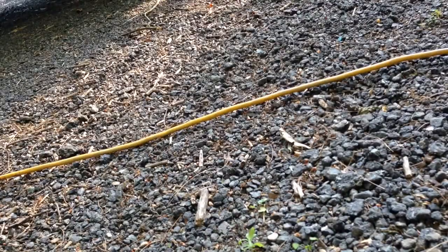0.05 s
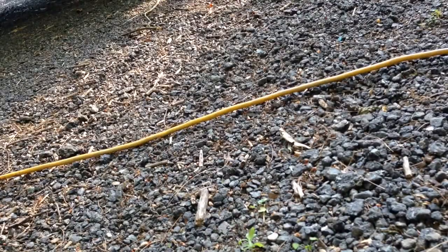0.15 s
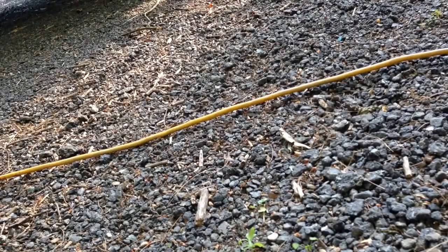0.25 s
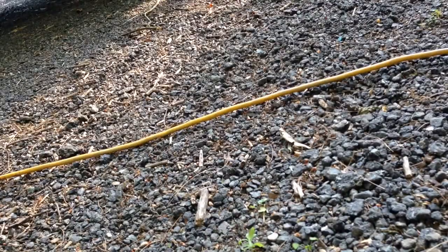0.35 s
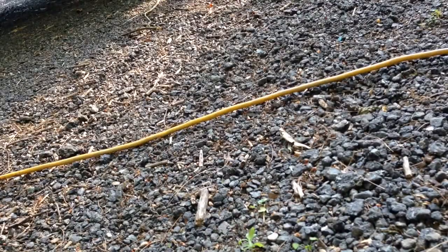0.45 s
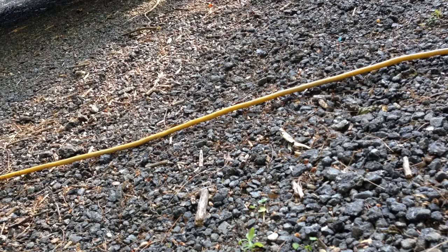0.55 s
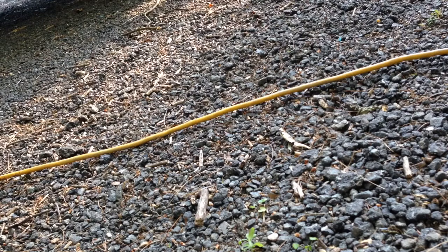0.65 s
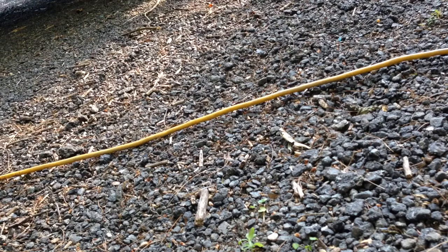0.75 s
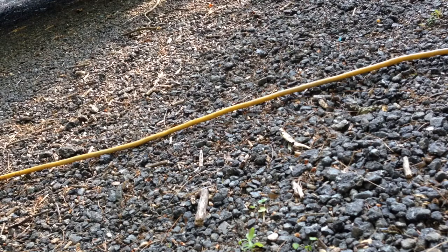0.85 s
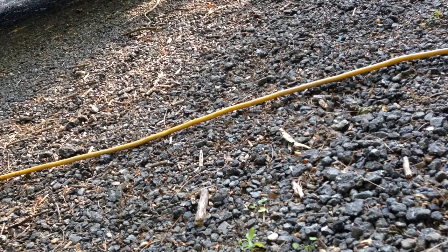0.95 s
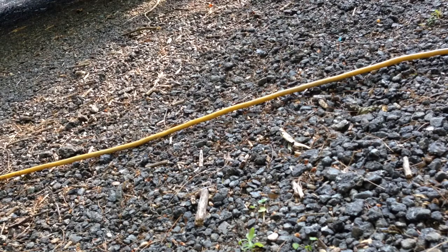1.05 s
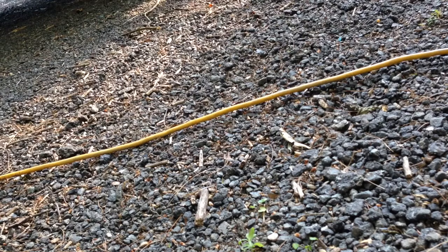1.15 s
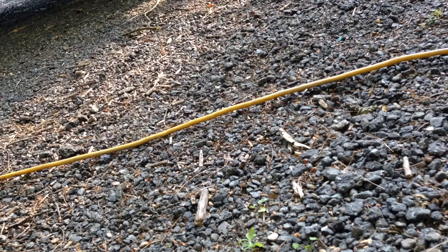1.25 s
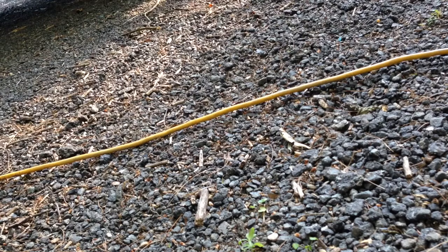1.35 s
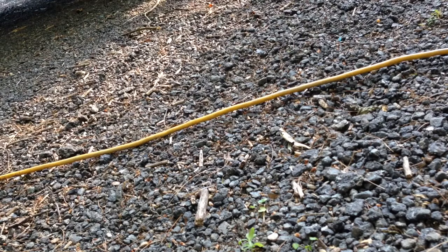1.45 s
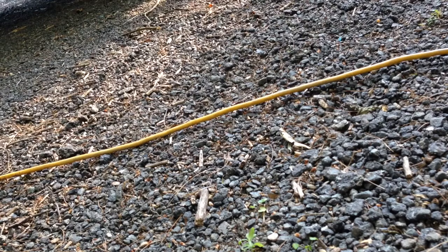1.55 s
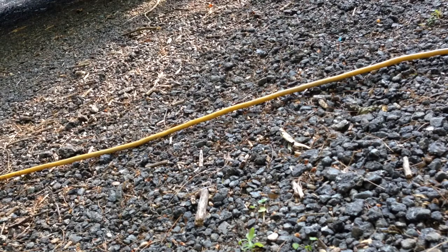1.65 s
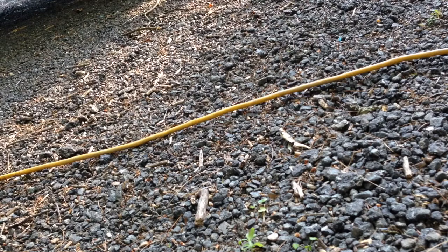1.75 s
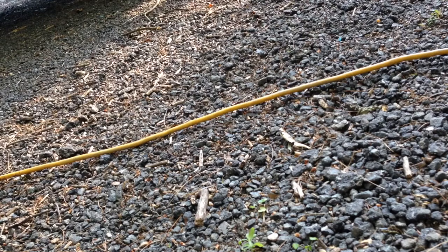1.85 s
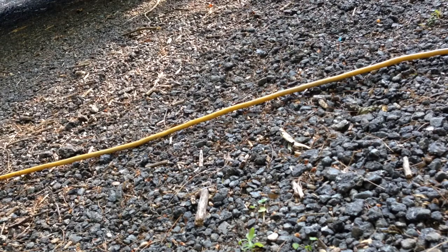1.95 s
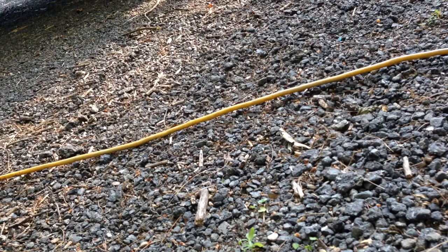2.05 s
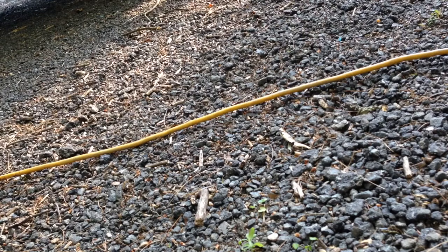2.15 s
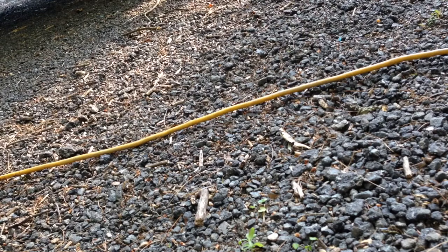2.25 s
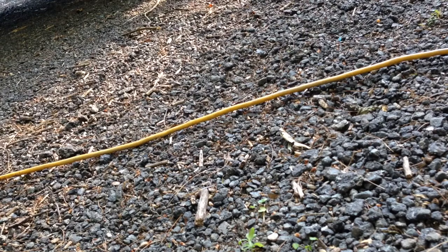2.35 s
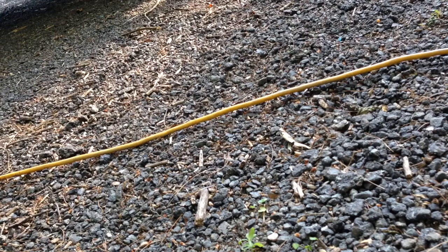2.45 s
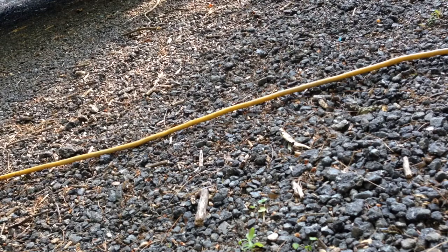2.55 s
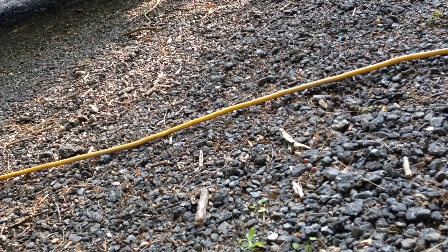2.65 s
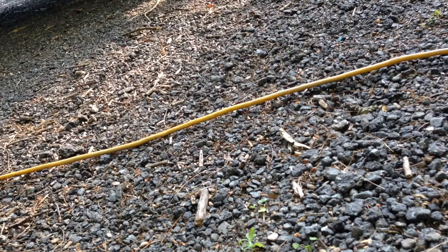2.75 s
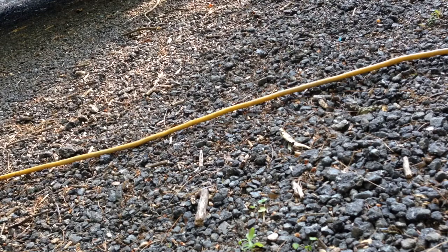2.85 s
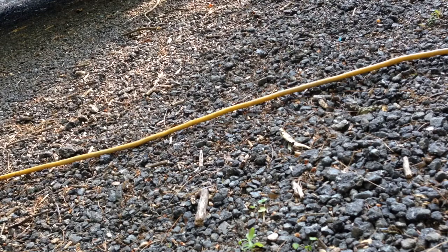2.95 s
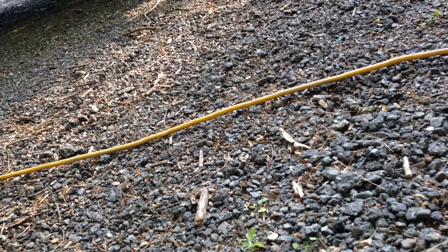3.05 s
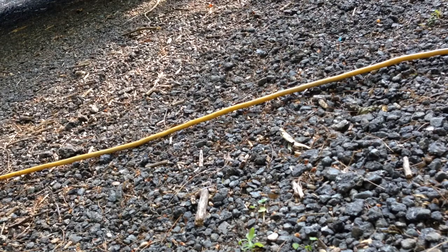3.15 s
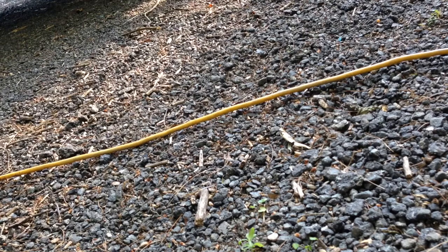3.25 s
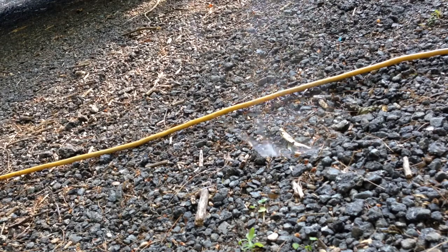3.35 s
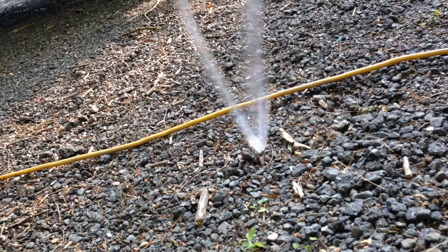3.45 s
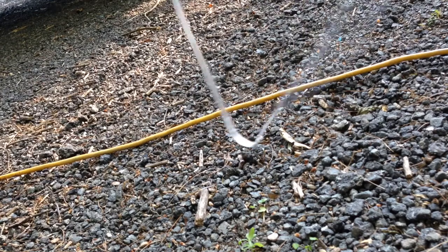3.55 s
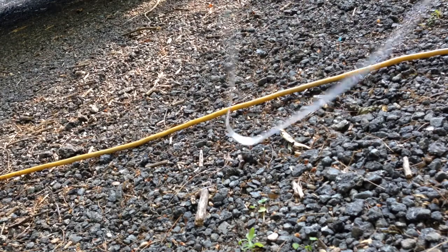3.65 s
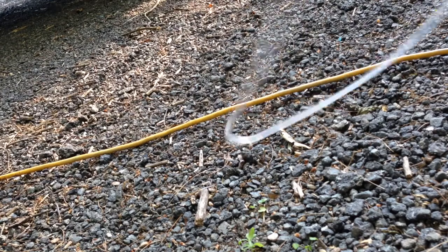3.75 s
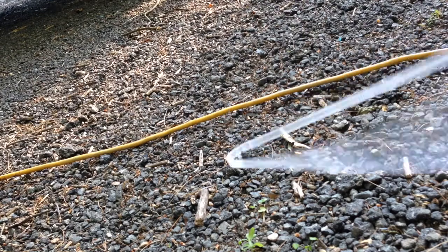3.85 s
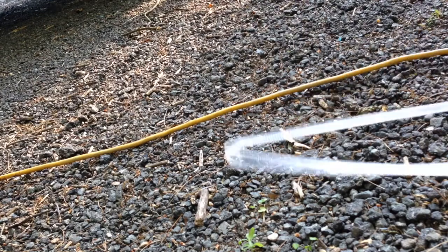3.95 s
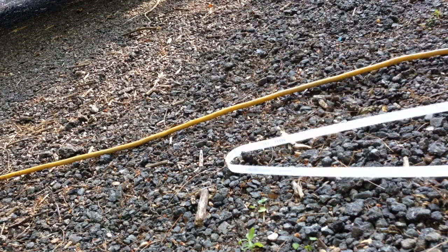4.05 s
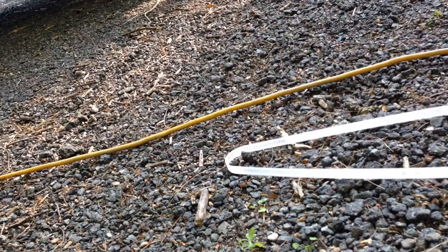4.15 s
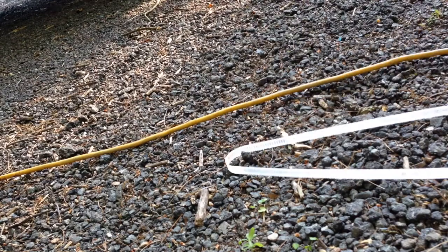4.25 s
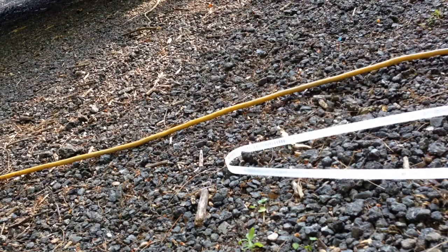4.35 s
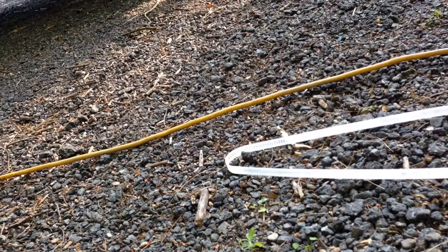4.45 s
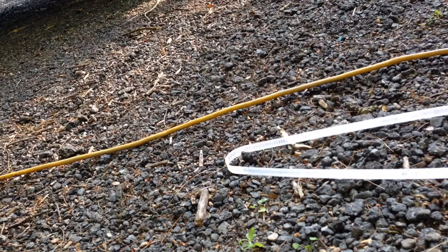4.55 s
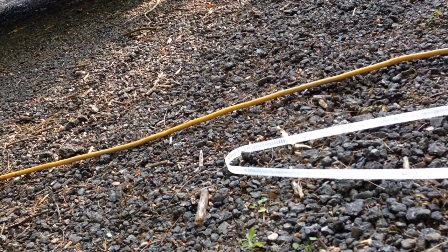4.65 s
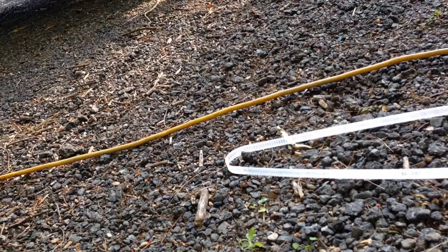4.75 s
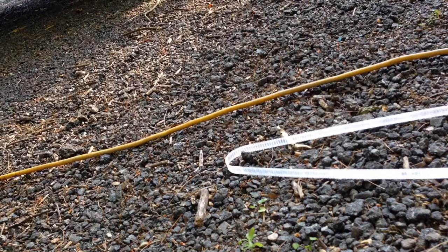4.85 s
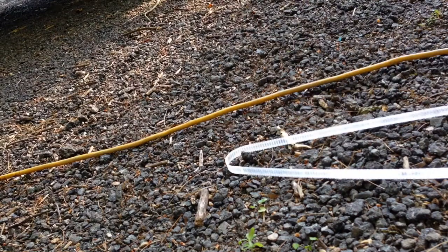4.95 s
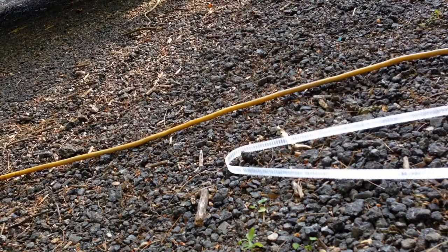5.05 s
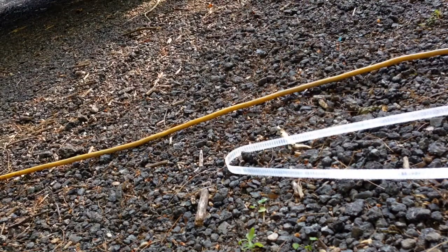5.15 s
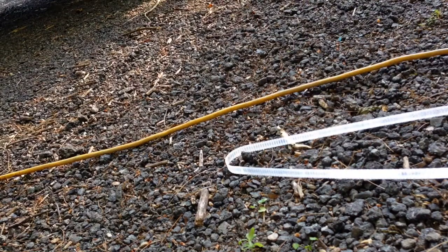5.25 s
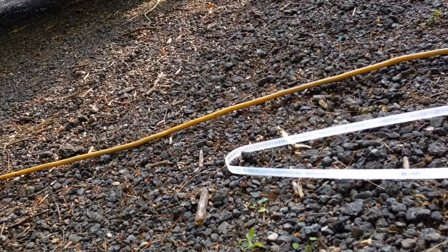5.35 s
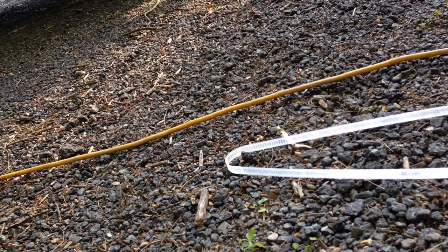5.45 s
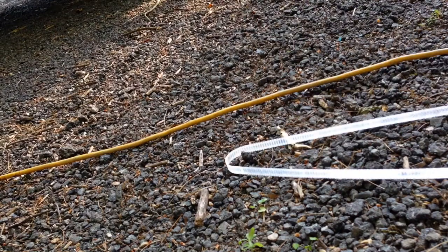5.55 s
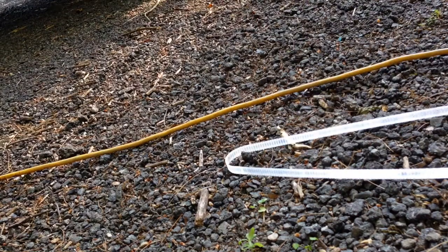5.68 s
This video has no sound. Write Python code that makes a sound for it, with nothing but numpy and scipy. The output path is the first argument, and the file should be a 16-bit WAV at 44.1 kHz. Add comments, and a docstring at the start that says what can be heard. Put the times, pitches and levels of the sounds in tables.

```python
"""A cut plastic strap on gravel, outdoors: light clicks and taps, then it snaps, springs off, thuds and clatters.
Impact bursts excite the strap's resonances; decaying sines make the landing; noise grains make the grit.
A small metal tool jingles at the end as struck modes. Distant birds are pitch-swept sines in garden echoes.
Low traffic rumble and hiss are coloured noise, with a low hum late on. The sound drops out briefly before the snap."""
import sys
import numpy as np
from scipy import signal
from scipy.fft import rfft, irfft
from scipy.io import wavfile
from scipy.ndimage import uniform_filter1d

SR = 44100
rng = np.random.default_rng(int(sys.argv[2]) if len(sys.argv) > 2 else 0)


def to_linear_factor(level_db):
    """Convert decibel levels (scalar or array-like) to linear amplitude factors."""
    exponent = np.asarray(level_db, float) / 20
    return 10 ** exponent


def int16_out(signal):
    """Quantize to a 16-bit WAV file."""
    q = np.round(np.clip(np.atleast_2d(signal).T, -1, 1) * 32767)
    wavfile.write(sys.argv[1], SR, q.astype(np.int16))


N = 252075
T = np.arange(N) / SR

# strap impacts: t/s, level/dB, ring f/Hz, crack re ring/dB, thrown grit level/dB
CLICKS = [(0.9196, -35.5, 2440, 3, -62), (1.525, -44, 5500, -2, -55), (2.2394, -42, 3350, 9, -59),
          (2.9505, -38, 5050, 3, -62), (2.976, -30.5, 7000, -7, -41.5), (2.9884, -39, 6100, 0, -62),
          (3.0094, -38, 3620, 5, -62), (3.032, -32, 2850, 5, -65), (3.1731, -37.5, 1520, 3, -68),
          (3.4429, -7.5, 6240, 4, -50), (3.4446, -17.5, 5600, 1, -52), (3.467, -40, 5000, 8, -62),
          (3.485, -37, 2020, 10, -60), (3.501, -38, 3510, 4, -60), (3.5553, -33, 8000, 6, -60),
          (3.5587, -25.5, 12400, 0, -54), (3.6338, -39, 4770, 7, -65), (3.742, -40, 3820, 4, -65),
          (3.8657, -34.5, 4520, 23, -63), (3.903, -33, 6340, 6, -53), (3.9126, -21, 6000, 10, -41.5),
          (3.921, -21, 9680, -2, -41.5), (3.928, -26, 5130, 8, -36), (3.9397, -23, 6160, 8, -52),
          (3.9685, -21, 4430, 5, -46), (3.9904, -15.5, 2480, 3.5, -40.5), (3.9952, -10.5, 2380, 6.5, -38.5),
          (3.9994, -20, 4760, -11, -43.5), (4.0148, -22, 3900, -11, -41.5), (4.026, -27, 2460, 2, -56),
          (4.0379, -19, 6000, 16, -56), (4.0444, -25, 4400, 6, -60), (4.0673, -25.5, 2500, 8, -42),
          (4.0884, -31, 2480, 10, -52), (4.3485, -37, 3500, -8, -64), (4.3803, -23.5, 5600, -1, -50),
          (4.4294, -45, 2470, 16, -69), (4.46, -37, 2850, 10, -67), (4.488, -37, 6140, 6, -65),
          (4.588, -43, 2310, -7, -60), (5.0992, -39, 3380, -20, -66), (5.6295, -27, 6560, -6, -54),
          (5.654, -36, 3540, -3, -54)]
# strap modes: f/Hz, width/Hz, level/dB
STRAP = [(2480, 740, 0.5), (4550, 3000, -5.5), (5000, 1900, -2), (6700, 1250, 0.5), (8260, 690, -4),
         (10600, 350, -27)]


def tail(t60, length):
    """Exponential fall of 60 dB in t60 s."""
    return np.exp(-np.log(1000) * np.arange(int(length * SR)) / SR / t60)


def band(x, hz, width):
    """Two-pole resonance, gain 1 at the centre."""
    return signal.lfilter(*signal.iirpeak(min(hz, .45 * SR), hz / width, fs=SR), x)


def unit(x):
    """Scale to rms 1."""
    return x / np.sqrt(np.mean(x ** 2))


def add(out, s, x):
    """Mix x into out from time s."""
    i = int(s * SR)
    out[i:i + len(x)] += x[:len(out) - i]


def walk(rate):
    """Random levels held 1 / rate s and slewed twice."""
    k = int(SR / rate)
    held = np.repeat(rng.standard_normal(N // k + 1), k)
    return 1.23 * uniform_filter1d(uniform_filter1d(held, k), k)[:N]


def swell(s, db, rise_ms, fall_ms):
    """Exponential rise to a peak at s, exponential fall."""
    ms = 1000 * (T - s)
    return to_linear_factor(db) * np.exp(np.minimum(ms / rise_ms, -ms / fall_ms))


def tone(hz, db):
    """Sine following a pitch and level track."""
    return to_linear_factor(db) * np.sqrt(2) * np.sin(2 * np.pi * np.cumsum(hz) / SR)


def echoes(x, t60, wet_db, patchy_db, top_hz):
    """Scattered returns from trees, walls and ground: decaying noise in clumps, dulled by the air."""
    response = rng.standard_normal(SR // 2) * tail(t60, .5) * to_linear_factor(patchy_db * walk(114.6)[:SR // 2])
    response = signal.lfilter(*signal.butter(2, min(top_hz, .45 * SR), fs=SR), response)
    response /= np.sqrt(np.sum(response ** 2))
    return x + to_linear_factor(wet_db) * signal.fftconvolve(x, response)[:N]


def air():
    """Traffic rumble and hiss: noise with swelling bass and smoother treble; a low hum swells late, then stays."""
    # noise spectrum: f/Hz, level/dB
    spectrum = [(12, -46), (22, -28), (50, -6), (90, 1.5), (126, -2), (200, -8), (227, -13), (280, -17),
                (460, -24.5), (850, -28), (1200, -30), (2600, -29), (4500, -32), (10000, -41),
                (15300, -42.5)]
    # traffic swell: t/s, level/dB
    rumble = [(0, 2.5), (.5, 0), (1.2, 1.5), (2, 0), (2.7, 0.5), (3.2, 1), (3.6, 2), (4.2, 1.5),
              (4.7, -1.5), (5.2, -0.5), (5.72, -1)]
    # low hum: t/s, f/Hz, level/dB
    hum_track = [(4.6, 181.2, -75), (4.65, 187.4, -49.5), (4.78, 186.3, -62.5), (4.89, 201.1, -45.5),
                 (4.93, 188.7, -58)]
    level_db = -45
    f = np.fft.rfftfreq(N, 1 / SR)
    hz, db = np.transpose(spectrum)
    shaped = rfft(rng.standard_normal(N)) * to_linear_factor(np.interp(np.log(f + 1), np.log(hz), db))
    bass = 1 / (1 + (f / 260) ** 4)
    low, high = irfft(shaped * bass, N), irfft(shaped * (1 - bass), N)
    swell_db = np.interp(T, *np.transpose(rumble)) + 0.3 * walk(12)
    noise = low * to_linear_factor(swell_db) + high * to_linear_factor(0.82 * walk(5.86))
    s, hum_hz, hum_db = np.transpose(hum_track)
    hum = tone(np.interp(T, s, hum_hz), np.interp(T, s, hum_db))
    return to_linear_factor(level_db) * unit(noise) + hum


def birds():
    """One bird repeats a warbling chirp of arched syllables, others whistle short notes; all far off, mostly echo."""
    # chirps: t/s, level/dB, pitch factor, time stretch
    chirps = [(0.447, -53.5, 0.95, 0.79), (1.245, -57.5, 0.95, 1), (2.085, -55.5, 0.98, 0.8),
              (2.767, -53.5, 0.99, 0.8), (3.532, -59, 1.04, 0.8), (4.301, -63, 1.01, 1.04),
              (5.313, -54.5, 1.01, 0.81)]
    # chirp syllables: t after start/s, length/s, start f/Hz, top f/Hz, end f/Hz, level/dB
    syllables = [(-.03, 0.0274, 5440, 5990, 6330, -9.5), (0, .062, 4202, 5005, 2960, 2.5),
                 (.084, .08, 2897, 3706, 2870, -4)]
    # whistled notes: t/s, length/s, start f/Hz, end f/Hz, level/dB
    whistles = [(0.295, 0.027, 2905, 2793, -56.5), (.352, 0.07, 2500, 2590, -64),
                (.415, 0.04, 3120, 3050, -62), (0.858, 0.033, 2610, 2640, -64),
                (.92, 0.024, 2454, 2514, -59.5), (1.027, .05, 2453, 2275, -62),
                (1.106, .07, 2300, 2440, -68), (1.202, 0.04, 3066, 2770, -60),
                (1.495, 0.071, 2730, 2560, -71), (1.636, 0.025, 8400, 8560, -56.5),
                (1.93, 0.09, 3165, 2965, -67.5), (2.505, 0.057, 2563, 2560, -70),
                (3.134, 0.01, 3120, 4590, -57), (4.133, 0.071, 3100, 3090, -66.5),
                (4.635, 0.041, 3130, 3070, -64), (4.696, 0.026, 2720, 2520, -62),
                (4.792, 0.043, 2264, 2280, -62)]
    arch_power, fade_db = 3.2, -4  # higher = flatter top; level change over a syllable
    trill_hz, trill_depth = 55, .04  # rate before stretch
    near, far = np.zeros(N), np.zeros(N)
    warble, flutter_db = 1 + .018 * walk(300), 3 * walk(200)
    for start, level_db, pitch, stretch in chirps:
        for after, length, from_hz, top_hz, to_hz, db in syllables:
            s = start + after * stretch
            u = np.linspace(-1, 1, int(length * stretch * SR))
            span = slice(int(s * SR), int(s * SR) + len(u))
            trill = 1 + trill_depth * np.sin(2 * np.pi * trill_hz * length * (u + 1) / 2)
            arch_hz = top_hz - (top_hz - np.where(u < 0, from_hz, to_hz)) * np.abs(u) ** arch_power
            track_hz = pitch * trill * warble[span] * arch_hz
            track_db = level_db + db + fade_db * (u + 1) / 2 + flutter_db[span]
            note = tone(track_hz, track_db) + tone(2 * track_hz, track_db - 20)
            add(near, s, note * signal.windows.tukey(len(u), .12))
    for start, length, from_hz, to_hz, level_db in whistles:
        count = int(length * SR)
        track_hz = np.linspace(from_hz, to_hz, count) * np.sqrt(warble[int(start * SR):][:count])
        add(far, start, tone(track_hz, level_db) * signal.windows.tukey(count, .4))
    far *= to_linear_factor(1.0 * walk(80))
    return echoes(near, 0.63, 1.4, 2.1, 6400) + echoes(far, 0.52, 0.73, 2.9, 4900)


def jingle():
    """Each blow strikes the same metal modes with its own strengths; many small knocks keep them buzzing."""
    # blows on the tool: t/s, level/dB, brightness/(dB per octave)
    blows = [(5.0971, -63, -12.5), (5.1715, -61, -12.5), (5.1992, -41.5, 3.5), (5.2619, -50.5, -1.5),
             (5.2844, -43, 1), (5.351, -45.5, -2), (5.3797, -44.5, 5), (5.458, -49, -3), (5.4754, -51, 15),
             (5.5183, -55, -4.5), (5.5443, -51.5, -4), (5.593, -53, -7), (5.626, -44.5, 5)]
    # tool modes: f/Hz, level/dB, t60/s
    metal = [(1836, -21, .3), (2600, -7, .12), (3500, -14, .05), (5140, -5, .09), (6142, 0, .1),
             (6340, -4, .09), (6900, -10, .03), (10200, -11, .06)]
    # small knocks: t/s, level/dB
    rattle = [(5.09, -85), (5.12, -69.5), (5.2, -59), (5.3, -60), (5.4, -62), (5.5, -54.5), (5.6, -65),
              (5.67, -75), (5.7, -92)]
    out = np.zeros(N)
    chance = rng.standard_normal((len(blows), len(metal), 2))
    t = np.arange(int(.4 * SR)) / SR
    attack = 1 - np.exp(-t / 0.00051)
    for (s, db, tilt_db), row in zip(blows, chance):
        for (hz, mode_db, t60), (size, detune) in zip(metal, row):
            level = to_linear_factor(db + mode_db + tilt_db * np.log2(hz / 6200) + 3.6 * size)
            sine = np.sin(2 * np.pi * hz * (1 + detune / 500) * t)
            add(out, s, level * tail(t60, .4) * sine * attack)
    knocks = rng.standard_normal((len(metal), N)) * (rng.random(N) < 90 / SR)  # 90 per second
    buzz = sum(to_linear_factor(db) * unit(band(k, hz, np.log(1000) / np.pi / t60))
               for k, (hz, db, t60) in zip(knocks, metal))
    return out + buzz * to_linear_factor(np.interp(T, *np.transpose(rattle)))


def rustle():
    """Dense grit grains of uneven size, bright and dull parts, bunching quickly; pebbles tick in the scrapes."""
    # scrapes of strap or tool over the stones: peak t/s, level/dB, spread/ms, low part re level/dB
    scrapes = [(.925, -52.5, 16.5, -5), (3.02, -64, 51, 6.5), (3.475, -58, 18, 1.5), (3.97, -54, 23, 6),
               (4.055, -50, 22, 1.5), (4.15, -65, 69, 7), (4.3, -57.5, 92, -0.5), (4.378, -49, 19, -1),
               (4.44, -56.5, 33, -12), (4.495, -53, 33, -4), (5.14, -64, 26, 8.5), (5.201, -54, 10.5, 4.5),
               (5.285, -52, 14.6, 4), (5.388, -55, 17, 2.5), (5.53, -57, 69, 5)]
    rise_ms, fall_ms, thrown_low_db = 2.2, 5.4, 2.5
    pebbles_per_s, pebble_db = 100, 10.5
    thrown = sum(swell(row[0] + rise_ms / 1000, row[-1], rise_ms, fall_ms) for row in CLICKS)
    scrape = sum(swell(s, db, ms, ms) for s, db, ms, _ in scrapes)
    scrape_low = sum(swell(s, db + low_db, ms, ms) for s, db, ms, low_db in scrapes)
    low = to_linear_factor(thrown_low_db) * thrown + scrape_low
    size_db = 2.2 * np.minimum(rng.exponential(size=(2, N)), 5) + 2 * walk(250)
    grains = rng.standard_normal((2, N)) * to_linear_factor(size_db)
    bright = unit(band(grains[0], 5900, 4500) + 0.38 * band(grains[0], 8800, 5000))
    dull = unit(band(band(grains[1], 3560, 4300), 2000, 5000) + 0.34 * band(grains[1], 1040, 1030))
    ticks = rng.standard_normal(N) * (rng.random(N) < pebbles_per_s / SR)
    ringing = sum(to_linear_factor(g) * band(ticks * scrape, f, w) * SR / w / 10 for f, w, g in STRAP)
    return (thrown + scrape) * bright + low * dull + to_linear_factor(pebble_db) * ringing


def struck(hz, db, t60):
    """One mode ringing out after a soft blow."""
    fall = tail(t60, .3)
    t = np.arange(len(fall)) / SR
    return to_linear_factor(db) * fall * (1 - np.exp(-t / 0.00053)) * np.sin(2 * np.pi * hz * t)


def thuds():
    """The strap's loop lands with a dull thud; a hollow note rings as it bounces."""
    # landing loop modes: f/Hz, level/dB, t60/s
    loop = [(271, -29.5, 0.068), (430, -27.5, 0.024), (544, -24.5, 0.018), (820, -26.5, 0.026)]
    # knocks on the hollow note: t/s, level/dB
    hollow = [(3.912, -39), (3.944, -44), (4.036, -43.5), (4.068, -52), (4.22, -48.5), (4.38, -51),
              (4.43, -52.5)]
    landing_s, hollow_hz, hollow_t60_s = 3.9345, 1025, 0.1
    out = np.zeros(N)
    add(out, landing_s, sum(struck(*mode) for mode in loop))
    for s, db in hollow:
        add(out, s, struck(hollow_hz, db, hollow_t60_s))
    return out


def bursts(count):
    """Short clusters of tiny impacts around one main release."""
    t = np.arange(1024) / SR
    out = 0.28 * rng.standard_normal((count, 1024)) * t / 0.00072 * np.exp(1 - t / 0.0005)
    out[:, 16] += 1.5
    return out


def ring(burst, hz, t60):
    """One short resonance."""
    return unit(band(band(burst, hz, hz / 2), hz, np.log(1000) / np.pi / max(t60, .002)))


def taps():
    """Compact knocks of dull plastic: a mid band and one short ring."""
    # taps: t/s, level/dB, ring f/Hz
    knocks = [(.0989, -29, 2330), (.2257, -28.5, 2260), (0.814, -43, 1340), (0.8646, -40.5, 2630),
              (0.9492, -40, 1430), (0.9772, -41, 2470), (1.01, -41, 1330), (1.0322, -39, 2320),
              (1.0993, -41, 1300), (1.202, -39, 2760), (1.3795, -37, 1880), (2.9719, -33.5, 2030)]
    low_hz, high_hz, ring_t60_s, ring_db = 1270, 2770, 0.0098, -0.5
    out = np.zeros(N)
    body = signal.butter(3, [low_hz, high_hz], "bandpass", fs=SR, output="sos")
    for (s, db, hz), burst in zip(knocks, bursts(count=len(knocks))):
        tap = unit(signal.sosfilt(body, burst)) + to_linear_factor(ring_db) * ring(burst, hz, ring_t60_s)
        add(out, s, to_linear_factor(db) * tap / np.abs(tap).max())
    return out


def clicks():
    """A burst of tiny impacts rings one short resonance, cracks through the strap's modes and knocks a dull body."""
    ring_cycles = 28  # to fall 60 dB
    body_db, body_db_per_octave = -6, -10  # re ring at 2.4 kHz; weaker under higher rings
    bounce_ms, bounce_db = 1.7, -29  # off the stones
    out = taps()
    for (s, db, hz, crack_db, _), burst in zip(CLICKS, bursts(count=len(CLICKS))):
        modes = sum(to_linear_factor(g) * band(band(burst, f, f), f, w) for f, w, g in STRAP)
        crack = .5 * band(burst, 5600, 7500) + modes
        body = band(band(burst, 1300, 2000), 1500, 2200)
        body_level = to_linear_factor(body_db + body_db_per_octave * np.log2(hz / 2400))
        click = ring(burst, hz, ring_cycles / hz) + to_linear_factor(crack_db) * unit(crack) + body_level * unit(body)
        add(out, s, to_linear_factor(db) * click / np.abs(click).max())
    lag = int(bounce_ms * SR / 1000)
    out[lag:] += to_linear_factor(bounce_db) * out[:-lag].copy()
    return echoes(out, .06, -18, 1.5, 9000)


def scene():
    """All sources at one microphone."""
    return (air() + birds() + jingle() + rustle() + thuds() + clicks())[None]


def band_limit(x):
    """A steep low-pass at the top of the band."""
    return signal.sosfilt(signal.butter(12, 16520, fs=SR, output="sos"), x)


def record(dry):
    """The signal loses its top; its level ducks, then drops out briefly."""
    top_hz = 15300
    duck_s, mute_s, back_s, duck_db, mute_db = 3.1125, 3.1245, 3.1373, -22, -70  # mute adds to duck
    ducked = (T > duck_s) & (T < back_s)
    muted = (T > mute_s) & (T < back_s)
    gate = uniform_filter1d(to_linear_factor(duck_db * ducked + mute_db * muted), size=40)
    wet = signal.sosfilt(signal.ellip(8, .2, 50, top_hz, fs=SR, output="sos"), dry)
    return band_limit(wet * gate)


dry = scene()
out = record(dry)
int16_out(out)
```